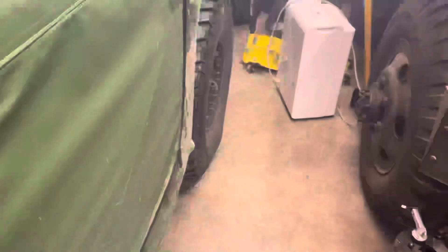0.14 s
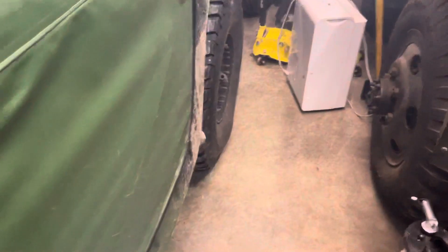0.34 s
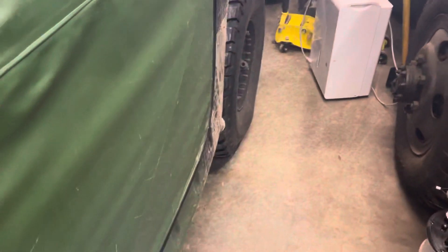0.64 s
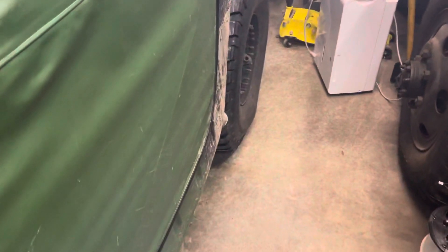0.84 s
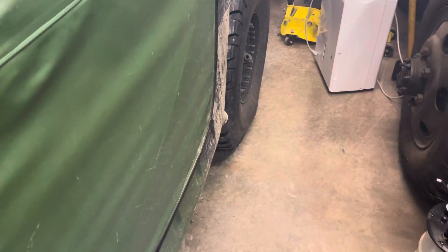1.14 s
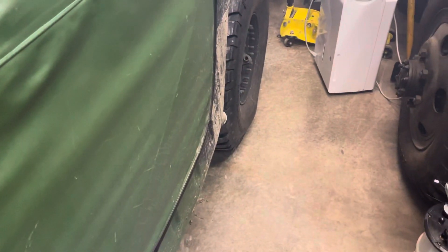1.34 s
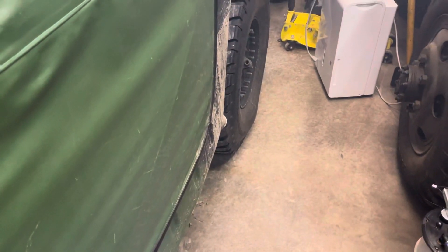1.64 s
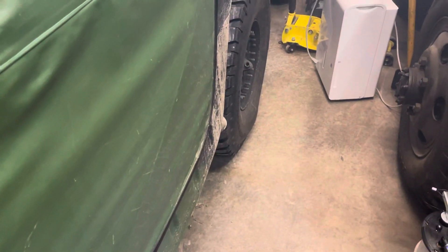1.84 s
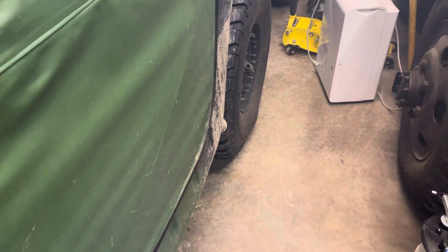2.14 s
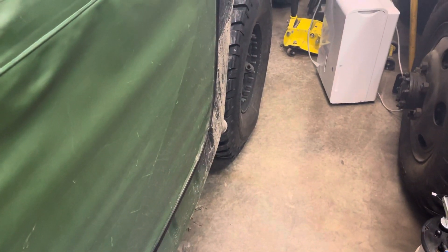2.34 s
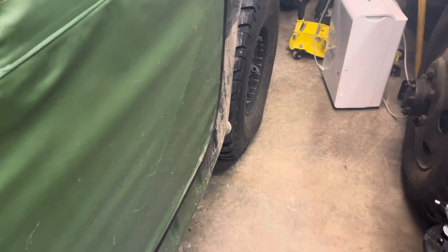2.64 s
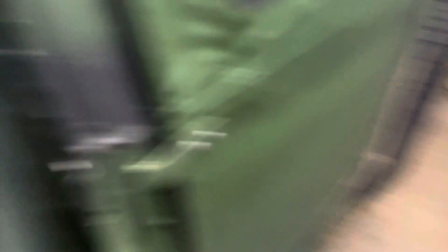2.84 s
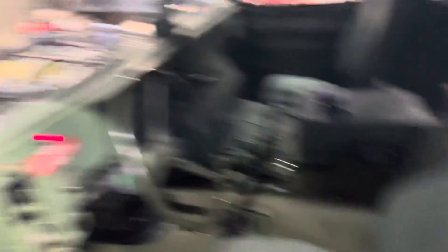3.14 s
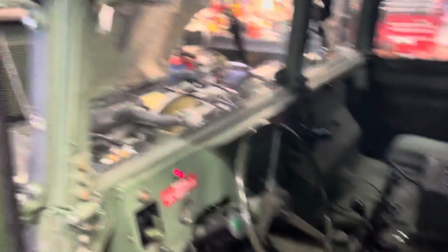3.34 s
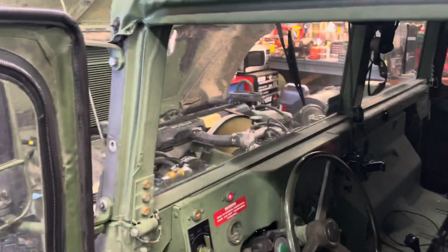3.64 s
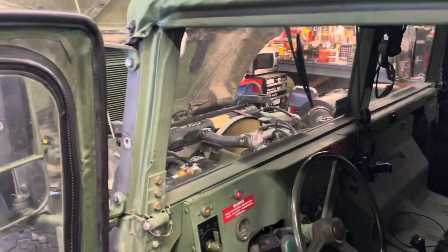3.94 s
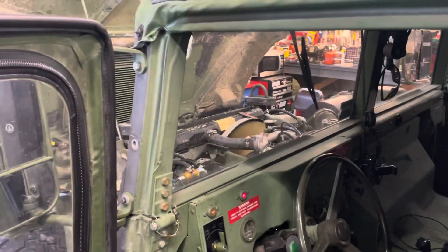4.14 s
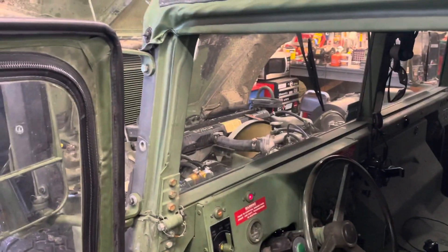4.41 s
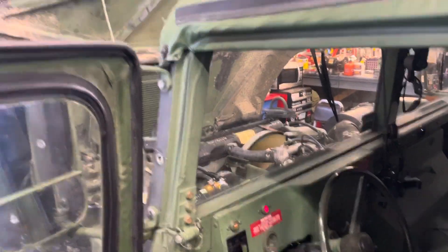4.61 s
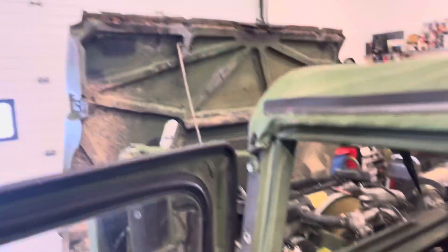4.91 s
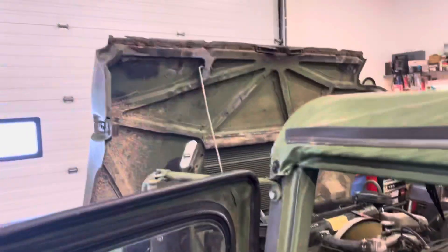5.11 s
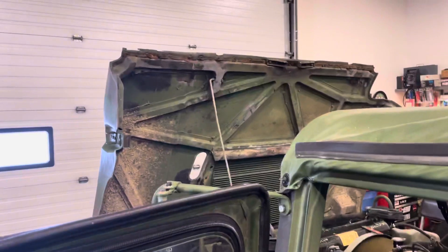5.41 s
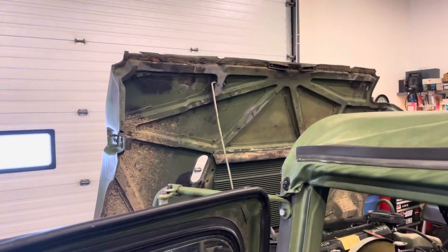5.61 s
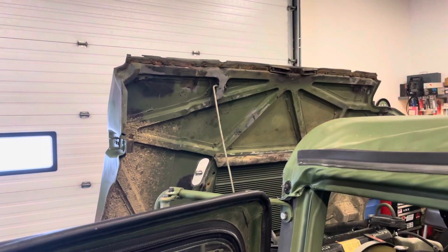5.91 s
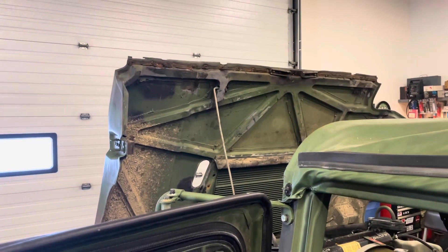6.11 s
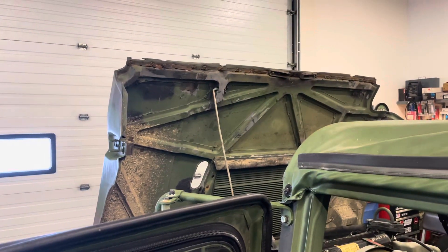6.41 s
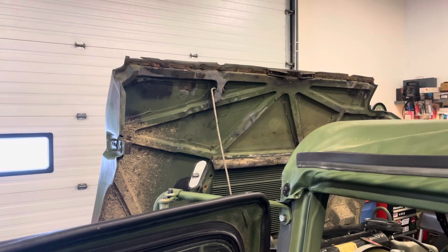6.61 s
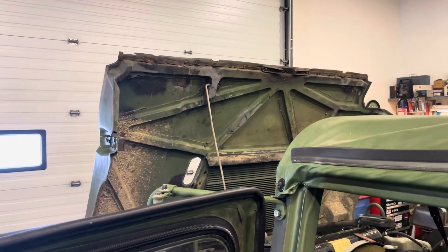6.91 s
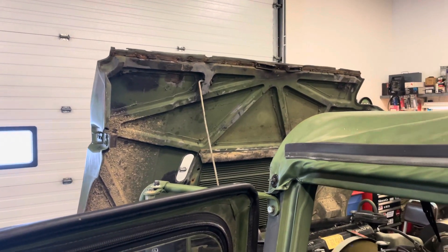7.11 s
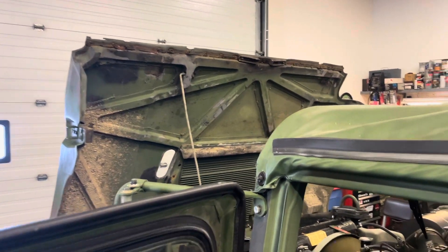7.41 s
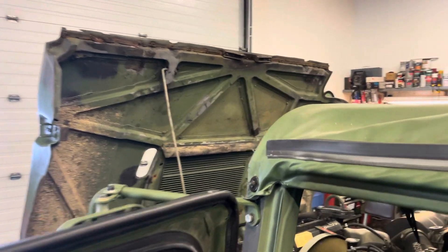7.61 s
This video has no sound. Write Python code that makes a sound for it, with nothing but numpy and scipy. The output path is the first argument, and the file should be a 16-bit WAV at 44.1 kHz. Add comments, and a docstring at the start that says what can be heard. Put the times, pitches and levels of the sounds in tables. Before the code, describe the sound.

A starter clunks and grinds briefly, then a cold diesel truck engine catches and settles into a loud, knocking, throbbing idle in a garage.

```python
"""A cold V8 diesel truck engine starts in a garage: the starter grinds, the engine catches and then idles.
The exhaust throbs at the firing rate, each cylinder knocks and chugs in its own way, and the valves tick between.
Bursts of noise rung through metal make the knocks, ticks, clinks and clacks; filtered noise makes the fan's air.
The knocks soften as the engine warms. The phone, partway from front wheel to cab door, moves up towards the door.
"""
import sys
import numpy as np
from scipy import signal
from scipy.fft import rfft, irfft
from scipy.io import wavfile
from scipy.ndimage import uniform_filter1d

SR = 44100
rng = np.random.default_rng(int(sys.argv[2]) if len(sys.argv) > 2 else 0)


def bounce(signal):
    """Save signal as a 16-bit WAV file at the path given by the first command-line argument."""
    frames = np.transpose(np.atleast_2d(signal))
    limited = np.clip(frames, -1, 1)
    pcm = np.round(limited * 32767).astype(np.int16)
    wavfile.write(sys.argv[1], SR, pcm)


N = 342216
T = np.arange(N) / SR  # time of every sample, s
HZ = np.maximum(np.arange(N // 2 + 1) * SR / N, 1)  # frequencies for filtering, Hz

# Levels in the tables are relative: the functions add their own trims and changes over time.
# crankshaft speed, mostly creeping up as the oil thins: time_s, firings_per_s
CRANK_SPEED = [(0, 35.98), (1.2, 37.215), (2.2, 37.27), (2.7, 37.63), (5, 38.09), (5.6, 38.445),
               (7, 38.785), (7.76, 38.05)]
# firing intervals that the crank must turn before the first cylinder fires
LEAD_IN = 2.44
# the engine has caught by CAUGHT_S; the starting surge and the cold harshness then die away
CAUGHT_S, SURGE_S, WARM_S = 0.8, 0.2, 2.46
# the phone's move: time_s, place (0 at the wheel, 1 at the cab door)
PHONE_MOVE = [(2.65, 0.54), (3.3, 0.96), (5, 0.83)]
# stereo width: pitch_hz, side_minus_mid_db
STEREO_WIDTH = [(60, -4), (130, -14), (380, -5), (700, -3.5), (1300, -2), (2400, -1.5), (4400, -3),
                (6500, -8), (8500, 25.5), (10500, 3.5), (12000, -6), (15000, -87)]
# stereo balance: pitch_hz, left_minus_right_db
STEREO_BALANCE = [(60, -2), (380, 1.5), (1200, -1.6), (2400, 0.5), (4400, 4), (6000, 4), (8000, -1)]

# the starter pinion slams in, grinds, and is thrown out
ENGAGE_S, ENGAGE_DB, RELEASE_S, STARTER_DB = 0.013, -24, 0.37, -20
# colour of the starter's grinding: pitch_hz, level_db
GEAR_COLOUR = [(50, 4.5), (120, 5.5), (320, -0.5), (930, -6.5), (1350, -8), (1850, -2.5), (2550, -6.5),
               (3450, -2.5), (4400, -3.5), (5600, -13.5), (7000, -6), (13800, -13.5), (15500, -41)]
# ringing of the starter housing and flywheel ring: pitch_hz, width_hz, level_db
HOUSING_MODES = [(920, 26, 12.5), (1680, 100, 5), (3060, 100, -2), (3440, 150, -1), (4000, 160, -10),
                 (4860, 260, 0), (5250, 73, 10)]
# colour of the fan's air noise: pitch_hz, level_db
AIR_COLOUR = [(100, 3), (300, 5.5), (900, 9), (2000, 2.5), (3000, -12), (5000, -6.5), (7500, -70),
              (10000, -8.5), (13800, -17), (15000, -35)]
# two booms as the body shudders: time_s, low_pitch_hz, low_level_db, high_pitch_hz, high_level_db
SHUDDER_BOOMS = [(0, 45, -42, 105, -38), (.1, 49.6, -32, 103, -27.5), (.17, 54.3, -20.5, 97, -27.5),
                 (.24, 57.6, -19, 108, -33), (.285, 56, -34, 112, -23.5), (.34, 60, -27, 96, -28),
                 (.41, 60, -34, 108, -27), (.5, 58, -55, 100, -50)]
# a thin ring by the wheel
RING_HZ, RING_WIDTH_HZ = 1254, 7.6
# exhaust lines from uneven gaps in each bank: multiple_of_cycle_rate, wheel_level_db, cab_level_db
EXHAUST_LINES = [(9, 0, -3), (11, -19, -22), (12, -10, -11), (13, -1, 0.5), (14, -21, -16), (15, -8, -8),
                 (17, -21, -10), (18, -4.5, -6), (19, -17, -16), (21, -14, -18), (22, -8, -13),
                 (23, -18, -21), (24, -12, -14)]
# the cylinders in firing order: cold_knock_db, warm_knock_db, lateness_in_firing_intervals,
# chug_pitch_hz, cold_chug_db, warm_chug_db
CYLINDER_TRAITS = [(-17.5, -34, .12, 1170, -18.5, -38.5), (-23, -33.5, .1, 1093, -19.5, -32.5),
                   (-26, -31, .17, 1070, -25.5, -34), (-22, -34, .3, 1187, -31, -35),
                   (-27.5, -37.5, 0.23, 1210, -25.5, -40), (-26, -35.5, .15, 650, -42, -41.5),
                   (-21, -36, .25, 900, -18.5, -33), (-21, -29.5, .35, 1170, -23.5, -29)]
# burns with their own time and level, in place of the pattern's; many bang out, some are soft:
# start_s, level_db
SINGLE_BURNS = [(0.229, -25), (.263, -19.5), (.326, -30), (0.382, -24), (.465, -26), (0.523, -16),
                (0.559, -23), (.605, -20.5), (.685, -23.5), (0.708, -17), (0.926, -24), (1.117, -22.5),
                (1.147, -25), (1.251, -26.5), (1.357, -20.5), (1.432, -23), (1.545, -25), (1.703, -25),
                (1.787, -21), (1.816, -20.5), (1.916, -24), (2.002, -21.5), (2.035, -23), (2.216, -23.5),
                (2.275, -24.5), (2.406, -25), (2.44, -22.5), (2.509, -22.5), (2.615, -23), (2.825, -25.5),
                (3.04, -23), (3.253, -23), (3.464, -30), (3.672, -22.5), (3.779, -24), (3.884, -24),
                (4.096, -24.5), (4.307, -27), (4.494, -28), (4.517, -23.5), (4.726, -26), (4.937, -22),
                (5.148, -26), (5.252, -27), (5.357, -25.5), (5.561, -24.5), (5.771, -25.5), (5.978, -21.5),
                (6.187, -25.5), (6.391, -25.5), (6.603, -28), (6.655, -27), (6.836, -25.5), (6.886, -26),
                (7.431, -24.5), (7.642, -28.5)]
# colour of the engine's metal noise: pitch_hz, level_db
BLOCK_COLOUR = [(60, -38), (170, -13.5), (270, -5), (350, -7.5), (500, -2), (750, 2), (900, -3), (1200, -3),
                (1450, -3), (1750, -4), (2120, -2), (2520, -12.5), (4200, -13.5), (4900, -37), (7500, -19),
                (13800, -27), (15000, -45)]
# ringing covers and brackets: pitch_hz, width_hz, level_db
COVER_MODES = [(184, 6.7, -4.5), (278, 110, -7), (476, 45, 1), (555, 8.3, 3.5), (909, 33, 8), (1156, 40, 2),
               (1259, 14.6, 9.5), (1530, 40, -3), (1620, 42, 3.5), (1785, 44, -2), (1909, 18, 1.5),
               (2875, 260, -0.5), (5230, 200, 17.5), (5670, 130, 11)]
# how the colour differs at the cab door: pitch_hz, level_db
CAB_COLOUR = [(130, 19.5), (210, 7), (310, 0.5), (480, -2.5), (670, 0.5), (900, -0.5), (1200, 2.5),
              (1600, 5), (1920, 8.5), (2350, 8.5), (3300, 0.5), (7000, -2)]
# a loose fitting clinks out louder, often along with a knock: start_s, level_db
CLINK_EVENTS = [(.385, -23), (.606, -25.5), (.708, -29.5), (.820, -30.5), (.875, -38), (.929, -33),
                (1.04, -35.5), (1.12, -37), (1.25, -43), (1.40, -42), (1.567, -36), (1.682, -33.5),
                (1.918, -35), (2.000, -38), (2.110, -37), (2.47, -46), (2.642, -34), (2.733, -39),
                (3.042, -51), (3.250, -36), (3.357, -41), (3.674, -37), (3.885, -36), (4.098, -40),
                (4.31, -40), (4.51, -42), (4.56, -40), (4.728, -37.5), (4.938, -31.5), (5.15, -42),
                (5.49, -38), (5.565, -40), (5.773, -41), (5.980, -30), (6.808, -39), (7.430, -43),
                (7.637, -39)]
# the band that the fitting's contact excites: pitch_hz, width_hz, level_db
CONTACT_BAND = (3800, 2500, 0)
# what the fitting rings with: pitch_hz, width_hz, level_db
FITTING_MODES = [(2850, 106, 5), (4040, 310, 0), (4260, 51, 7.5), (4430, 43, 1), (5420, 30, 0),
                 (5820, 110, -6.5)]
# a loose panel under the bonnet clacks: start_s, pitch_hz, level_db
CLACK_EVENTS = [(4.70, 2130, -32), (4.985, 2140, -30), (5.255, 1860, -23), (5.29, 2140, -31),
                (5.43, 1950, -32), (5.81, 1800, -26), (5.89, 1740, -26), (6.055, 1920, -26),
                (6.215, 1930, -24), (6.259, 1940, -25), (6.36, 1920, -24), (6.44, 1930, -29),
                (6.505, 2010, -27), (6.656, 1930, -27), (6.69, 2110, -24.5), (6.885, 1960, -28),
                (7.28, 1920, -30), (7.46, 2010, -35), (7.591, 2000, -26)]


def undb(db):
    """Turn decibels into a gain."""
    return 10 ** (np.asarray(db) / 20)


def unit(x):
    """Scale to an average (rms) level of 1."""
    return x / np.sqrt(np.mean(x ** 2))


def curves(table):
    """Draw each column of a time table as joined straight lines, sample by sample."""
    s, *columns = np.transpose(table)
    return [np.interp(T, s, column) for column in columns]


def shape(table):
    """Gain at every frequency, joined up from pitch and level points."""
    hz, db = np.transpose(table)
    return undb(np.interp(np.log(HZ), np.log(hz), db))


def resonance(hz, width_hz):
    """How one ringing mode answers each frequency; its gain is 1 at its own pitch."""
    return 1 / (1 + 1j * (HZ / hz - hz / HZ) * hz / width_hz)


def body(modes):
    """A metal body's answer: all of its ringing modes added up."""
    return sum(undb(db) * resonance(hz, width_hz) for hz, width_hz, db in modes)


def through(x, response):
    """Filter a sound by a frequency response."""
    return irfft(rfft(x) * response, N)


def walk(rate):
    """A random wander with a spread near 1, from about `rate` smoothed steps a second."""
    k = int(SR / rate)
    steps = np.repeat(rng.standard_normal(N // k + 1), k)
    return 1.3 * uniform_filter1d(uniform_filter1d(steps, k), k)[:N]


def microphones(pair, colour):
    """Colour two unrelated white signals and spread them over left and right; the power stays the same."""
    side_gain = shape(STEREO_WIDTH)
    gain = colour / np.sqrt(np.mean(np.abs(colour) ** 2) * (1 + side_gain ** 2))
    mid = rfft(pair[0]) * gain
    side = rfft(pair[1]) * gain * side_gain
    lean = np.sqrt(shape(STEREO_BALANCE))
    return irfft(np.array([(mid + side) * lean, (mid - side) / lean]), N)


def patches(hz, spacing_hz, depth_db, count=2000, size=5):
    """Random peaks and dips along frequency, as from many crowded modes; neighbours even out."""
    power = undb(depth_db * rng.standard_normal(count)) ** 2
    evened = np.sqrt(power / uniform_filter1d(power, size))
    return unit(np.interp(hz / spacing_hz, np.arange(count), evened))


def path(burst_s, room_t60, room_db, patchy_db, patch_hz=170, rise_s=0.00066, grain_db=2, grain_hz=350):
    """One part's grainy, unevenly coloured rattle and garage tail; its fade has rms 1 over the first 25 ms."""
    t = np.arange(SR // 2) / SR
    colour = patches(np.arange(len(t) // 2 + 1) * SR / len(t), patch_hz, patchy_db)
    grain = undb(grain_db * np.interp(t * grain_hz, np.arange(len(t)), rng.standard_normal(len(t))))
    noise = rng.standard_normal((2, len(t))) * unit(grain)
    ring = irfft(rfft(noise) * colour, len(t))
    # early reflections in the engine bay hold the level for a moment before it drops to the tail
    early = np.exp(-(t / burst_s) ** 2)
    tail = undb(room_db) * np.exp(-np.log(1000) * t / room_t60)
    fade = np.hypot(early, tail) * (1 - np.exp(-t / rise_s))
    return ring * fade / np.sqrt(np.mean(fade[:SR // 40] ** 2))


def ringing(burst, modes):
    """A burst heard through ringing modes; it keeps its energy."""
    ring = sum(undb(db) * signal.lfilter(*signal.iirpeak(hz, hz / width_hz, fs=SR), burst)
               for hz, width_hz, db in modes)
    energy_in = np.sum(burst ** 2, axis=1, keepdims=True)
    return ring * np.sqrt(energy_in / np.sum(ring ** 2, axis=1, keepdims=True))


def add(out, sound, s):
    """Mix a sound in at a time."""
    i = int(np.clip(s * SR, 0, N))
    out[:, i:i + sound.shape[1]] += sound[:, :N - i]


def moved():
    """The phone's place at each moment, from 0 at the wheel to 1 at the cab door."""
    return np.clip(curves(PHONE_MOVE)[0], 0, 1)


def risen():
    """The phone's move stretched to run fully from 0 to 1."""
    return (moved() - moved().min()) / np.ptp(moved())


def settling(t, cold_db, surge_db, full_s, rise_db_per_s):
    """Level in dB against the warm idle: a rise until full_s, then the surge and cold parts die away."""
    running = np.maximum(t - CAUGHT_S, 0)
    cold = cold_db * np.exp(-running / WARM_S)
    surge = surge_db * np.exp(-running / SURGE_S)
    return cold + surge - rise_db_per_s * np.maximum(full_s - t, 0)


def starter(firings, teeth=35, rasp=0.74, attack_s=0.00086, release_s=0.053, coast_db=-12, coast_s=0.21,
            chatter_db=1.0, load_db=-0.6, build_db_per_s=6):
    """The pinion scrapes the ring gear tooth by tooth, harder at each compression, until it is thrown out."""
    mesh = 1 + rasp * np.cos(2 * np.pi * teeth * firings)
    build_db = -build_db_per_s * np.maximum(RELEASE_S - T, 0)
    compression_db = load_db * np.cos(2 * np.pi * firings)
    force = undb(chatter_db * walk(400) + build_db + compression_db)
    grind = unit(rng.standard_normal((2, N)) * mesh * force)
    # once free, the sound drops quickly and then dies away as the starter coasts
    free = np.maximum(T - RELEASE_S, 0)
    fall = np.maximum(np.exp(-free / release_s), undb(coast_db) * np.exp(-free / coast_s))
    envelope = (1 - np.exp(-T / attack_s)) * fall
    colour = shape(GEAR_COLOUR) * np.abs(1 + body(HOUSING_MODES))
    return microphones(grind, colour) * undb(STARTER_DB) * envelope


def fan(fall_db_per_s=0.5):
    """A smooth rush of air, made of coloured noise, that slowly eases and wavers a little."""
    air_db = -32.5 - fall_db_per_s * T + 0.5 * walk(3.7)
    return microphones(rng.standard_normal((2, N)), shape(AIR_COLOUR)) * undb(air_db)


def shudder():
    """Two short booms that swoop while the engine rocks on its mounts."""
    low_hz, low_db, high_hz, high_db = curves(SHUDDER_BOOMS)
    return sum(np.sqrt(2) * np.sin(2 * np.pi * np.cumsum(hz) / SR) * undb(db)
               for hz, db in ((low_hz, low_db), (high_hz, high_db)))


def thin_ring(level_db=-10, fall_db=42, build_s=0.24):
    """A lightly damped part by the wheel builds up a ring, which fades as the phone moves away."""
    ring = microphones(rng.standard_normal((2, N)), resonance(RING_HZ, 2 * RING_WIDTH_HZ) ** 2)
    return ring * (1 - np.exp(-T / build_s)) * undb(level_db - fall_db * moved())


def exhaust(firings, idle_throb_db=-24.5, idle_overtone_db=-35, waver=0.054, gas_db=-14, lean_db=0.83,
            octave_db=-20):
    """The firing rate booms; uneven gaps in each bank add lines at multiples of the cycle rate."""
    throb_db = idle_throb_db + settling(T, cold_db=6.0, surge_db=0.5, full_s=0.4, rise_db_per_s=85)
    overtone_db = idle_overtone_db + settling(T, cold_db=7, surge_db=3.5, full_s=0.45, rise_db_per_s=40)
    # the octave is tied to the firings: round crests, sharp troughs
    turn = 2 * np.pi * firings
    puffs = np.cos(turn) - undb(octave_db) * np.cos(2 * turn)
    throb = np.sqrt(2) * puffs * undb(throb_db + 0.15 * walk(12))
    cycle = turn / len(CYLINDER_TRAITS)
    rise = risen()
    lines = np.zeros(N)
    for count, wheel_db, cab_db in EXHAUST_LINES:
        strength = undb(wheel_db + (cab_db - wheel_db) * rise) * (1 + waver * walk(7.4))
        phase = round(count) * cycle + rng.uniform(0, 2 * np.pi) + waver * walk(6.3)
        lines += strength * np.cos(phase)
    gas = microphones(rng.standard_normal((2, N)), resonance(hz=95.0, width_hz=110) ** 2)
    overtones = (unit(lines) + undb(gas_db) * gas) * undb(overtone_db)
    return (throb + overtones) * undb(np.array([[lean_db], [-lean_db]]))


def pinion():
    """One clunk as the starter's pinion slams into the ring gear."""
    out = np.zeros((2, N))
    clunk = path(burst_s=0.025, room_t60=0.62, room_db=12, patchy_db=-7.0)
    add(out, undb(ENGAGE_DB) * clunk, ENGAGE_S)
    return out


def valves(firings, scatter_db=1.0, count=16):
    """Sixteen valves seat once a cycle, each with its own short tick."""
    out = np.zeros((2, N))
    cylinders = len(CYLINDER_TRAITS)
    for seat in (np.arange(count) + rng.uniform(0, 1, count)) * cylinders / count:
        tick = path(burst_s=0.007, room_t60=0.57, room_db=-10, patchy_db=5.5, patch_hz=140)
        for turn in np.arange(seat, firings[-1], cylinders):
            add(out, tick * undb(scatter_db * rng.standard_normal()), np.interp(turn, firings, T))
    return unit(out)


def burns(firings, scatter_db=1.0, jitter=0.008):
    """List each firing's time, level and cylinder: they take turns, each with its own strength and delay."""
    chance = rng.standard_normal((int(firings[-1]), 2))
    # a single burn takes the place of a pattern burn close to it
    single = {int(np.interp(s, T, firings) + 0.3): (s, db) for s, db in SINGLE_BURNS}
    rows = []
    for k, (timing, strength) in enumerate(chance):
        cylinder = k % len(CYLINDER_TRAITS)
        cold_db, warm_db, late = CYLINDER_TRAITS[cylinder][:3]
        s = np.interp(k + late + jitter * timing, firings, T)
        change_db = settling(s, cold_db=cold_db - warm_db, surge_db=-3.0, full_s=0.32, rise_db_per_s=82)
        db = warm_db + change_db + scatter_db * strength
        rows.append((*single.get(k, (s, db)), cylinder))
    return rows


def chamber(x, hz, width_hz=260, gain=0.65):
    """The burning gas rings at one pitch and stresses that part of the knock."""
    hz = np.clip(hz, 600, 3200)
    return x + gain * signal.lfilter(*signal.iirpeak(hz, hz / width_hz, fs=SR), x)


def combustion(blows, trim_db=-3, drift=0.862, warm_hz=1850, cold_hz=1600, spread=0.25):
    """Every firing strikes the block; a cylinder rings much as a cycle before, and higher as its gas heats."""
    rings = [[path(burst_s=0.029, room_t60=0.62, room_db=-8.5, patchy_db=4.2, rise_s=0.0006)
              for way in range(2)] for cylinder in CYLINDER_TRAITS]
    out = np.zeros((2, N))
    chance = rng.standard_normal((len(blows), 2))
    for (s, db, cylinder), (place, pitch) in zip(blows, chance):
        # the burn starts at a slightly different place each time, which blends two ways of ringing
        blend = drift * s + 0.33 * place
        first, second = rings[cylinder]
        knock = np.cos(blend) * first + np.sin(blend) * second
        gas_hz = warm_hz + (cold_hz - warm_hz) * np.exp(-s / WARM_S)
        add(out, chamber(knock, gas_hz * np.exp(spread * pitch)) * undb(db + trim_db), s)
    return out


def machinery(firings, blows, valve_db=-32.5, low_db=7.0, low_fall_db=5.5):
    """Knocks, valve ticks and the pinion clunk, coloured by the block, its covers and the listening place."""
    tick_db = valve_db + settling(T, cold_db=3.5, surge_db=5.0, full_s=0.33, rise_db_per_s=87)
    strikes = combustion(blows) + valves(firings) * undb(tick_db) + pinion()
    sound = microphones(strikes, shape(BLOCK_COLOUR) * np.abs(1 + body(COVER_MODES)))
    # each place has its own fine pattern of reflections, weaker below 2000 Hz
    depth = np.minimum(HZ / 2000, 1)
    wheel, cab = (through(sound, colour * patches(HZ, spacing_hz=20, depth_db=3.0) ** depth)
                  for colour in (1, shape(CAB_COLOUR)))
    sound = (1 - moved()) * wheel + moved() * cab
    # the low block modes come out under the truck and weaken as the phone rises
    low = through(sound, np.abs(resonance(hz=1030, width_hz=390)) ** 2)
    return sound + low * (undb(low_db - low_fall_db * moved()) - 1)


def chugs(blows, level_db=-0.4, width_hz=260, spread=0.019, scatter_db=1.46, drift=0.72):
    """Each burn heaves the block near its cylinder's own pitch; uneven strengths make the idle lope."""
    heaves = [[path(burst_s=0.029, room_t60=0.5, room_db=-13, patchy_db=1.5, rise_s=0.005)
               for way in range(2)] for cylinder in CYLINDER_TRAITS]
    out = np.zeros((2, N))
    chance = rng.standard_normal((len(blows), 2))
    for (s, knock_db, cylinder), (pitch, strength) in zip(blows, chance):
        hz, cold_db, warm_db = CYLINDER_TRAITS[cylinder][3:]
        first, second = heaves[cylinder]
        burst = np.cos(drift * s) * first + np.sin(drift * s) * second
        mode = [(hz * np.exp(spread * pitch), width_hz, 0)]
        heave = ringing(ringing(burst, mode), mode)
        change_db = settling(s, cold_db=cold_db - warm_db, surge_db=-2.5, full_s=0.24, rise_db_per_s=110)
        add(out, heave * undb(warm_db + change_db + level_db + scatter_db * strength), s)
    return microphones(out, np.ones(len(HZ)))


def clinks(blows, ordinary_db=-21, level_db=0, scatter_db=2.5):
    """A loose fitting chatters faintly with each knock, and now and then clinks out louder, often with one."""
    rattles = [path(burst_s=0.034, room_t60=0.6, room_db=-7, patchy_db=3, rise_s=0.001) for way in range(21)]
    chatter = [ringing(ringing(rattle, [CONTACT_BAND]), FITTING_MODES) for rattle in rattles]
    faint = [(s, db + ordinary_db + scatter_db * rng.standard_normal()) for s, db, cylinder in blows]
    out = np.zeros((2, N))
    for s, db in list(CLINK_EVENTS) + faint:
        add(out, undb(db + level_db) * chatter[rng.integers(len(chatter))], s)
    return microphones(out, np.ones(len(HZ)))


def cracks(level_db=-4.5, wheel_hz=1250, cab_hz=1720, width_hz=1200, cold_db=-1.5):
    """Each single burn opens with a short crack: low near the wheel, brighter near the cab door."""
    out = np.zeros((2, N))
    for s, db in SINGLE_BURNS:
        crack = path(burst_s=0.02, room_t60=0.6, room_db=-11, patchy_db=4.5, patch_hz=110, rise_s=0.0004)
        add(out, crack * undb(db + level_db + cold_db * np.exp(-s / WARM_S)), s)
    wheel, cab = (microphones(out, resonance(hz, width_hz) ** 2 * np.abs(resonance(hz, 2 * width_hz)))
                  for hz in (wheel_hz, cab_hz))
    rise = risen()
    return (1 - rise) * wheel + rise * cab


def clacks(level_db=-1, width_hz=260):
    """A loose panel clacks: each time, a short burst rings at one pitch."""
    out = np.zeros((2, N))
    for s, hz, db in CLACK_EVENTS:
        mode = [(hz, width_hz, 0)]
        burst = path(burst_s=0.018, room_t60=0.66, room_db=-12, patchy_db=7)
        add(out, ringing(ringing(burst, mode), mode) * undb(db + level_db), s)
    return microphones(out, np.ones(len(HZ)))


def scene():
    """One crankshaft times the starter, exhaust, burns and valves; the other sounds join them."""
    firings = np.cumsum(curves(CRANK_SPEED)[0]) / SR - LEAD_IN  # firings counted so far
    blows = burns(firings)
    start = starter(firings) + fan() + shudder() + thin_ring() + exhaust(firings)
    engine = machinery(firings, blows) + chugs(blows)
    rattles_and_cracks = clinks(blows) + cracks() + clacks()
    return start + engine + rattles_and_cracks


def record(dry):
    """The phone rounds the loudest peaks and cuts everything above 15 kHz."""
    rounded = dry / (1 + (dry / 0.9) ** 4) ** 0.25
    return signal.sosfilt(signal.ellip(8, 0.2, 70, 15000, fs=SR, output="sos"), rounded)


dry = scene()
out = record(dry)
bounce(out)
```